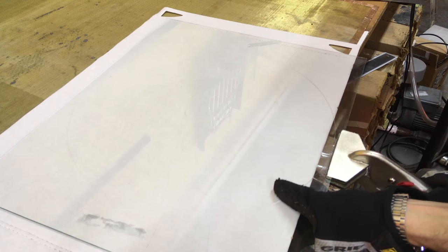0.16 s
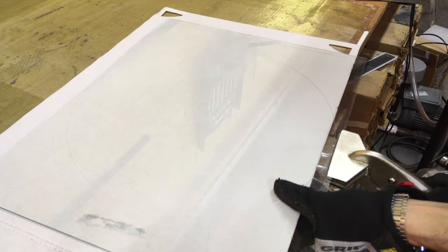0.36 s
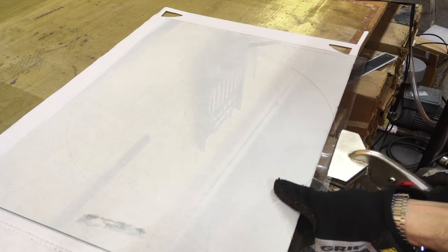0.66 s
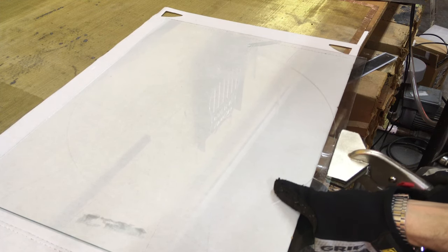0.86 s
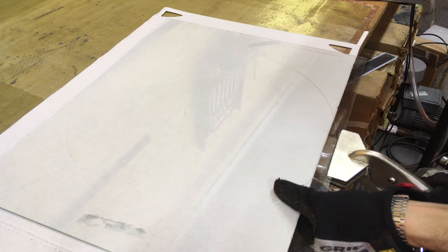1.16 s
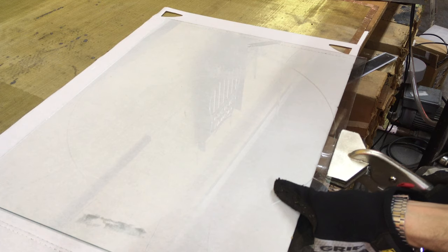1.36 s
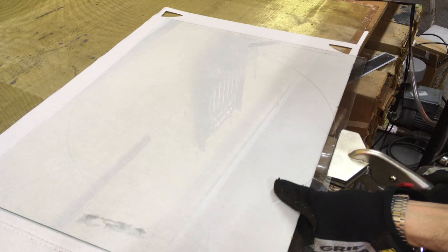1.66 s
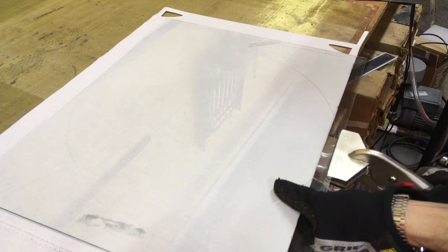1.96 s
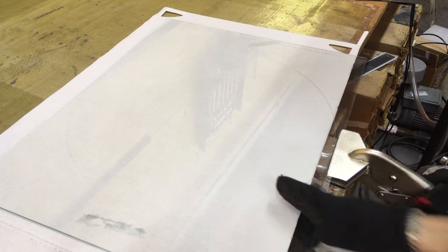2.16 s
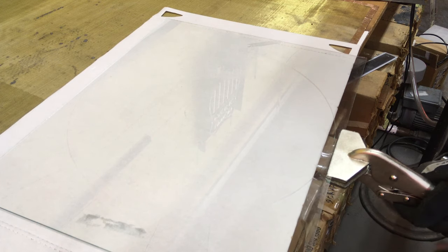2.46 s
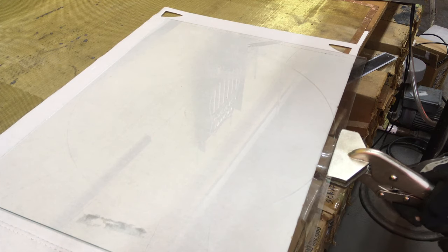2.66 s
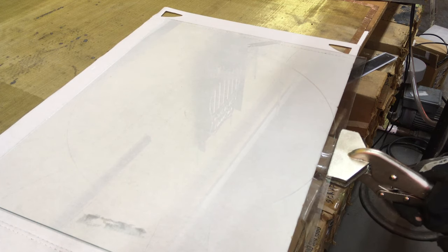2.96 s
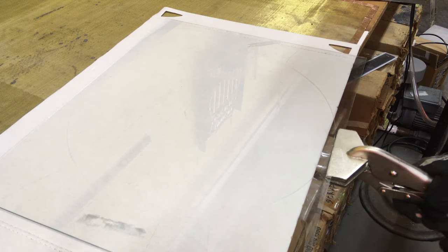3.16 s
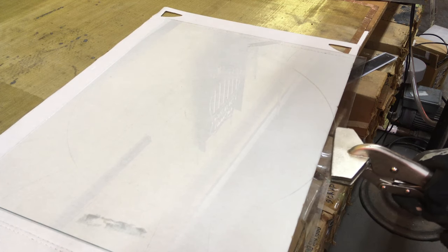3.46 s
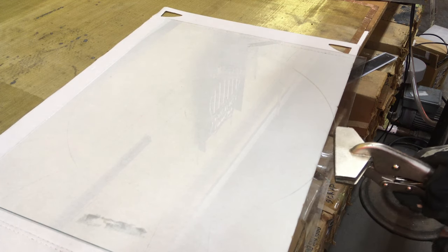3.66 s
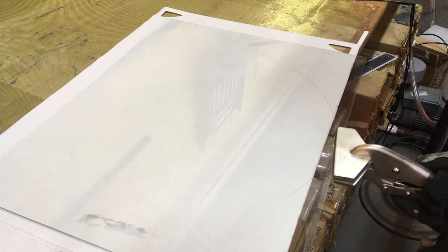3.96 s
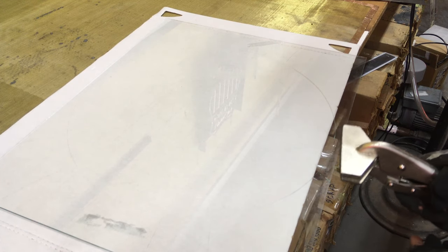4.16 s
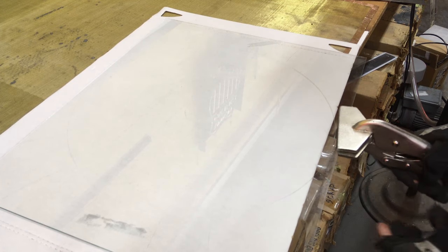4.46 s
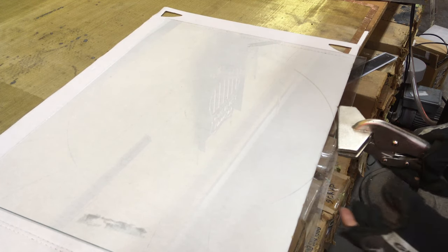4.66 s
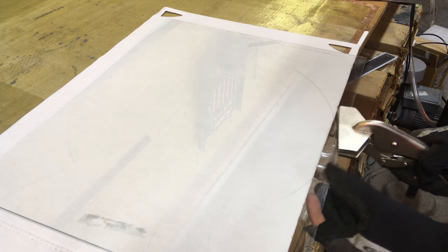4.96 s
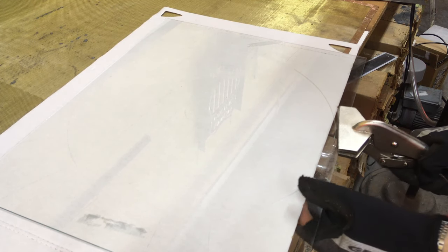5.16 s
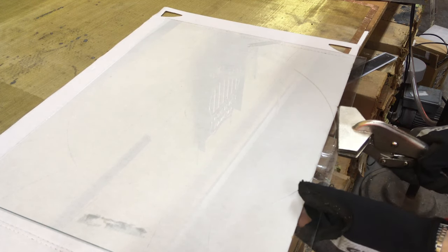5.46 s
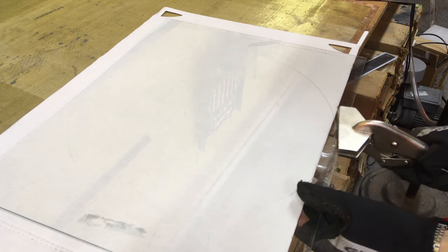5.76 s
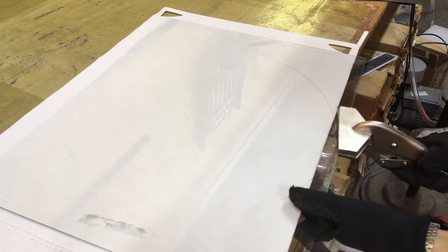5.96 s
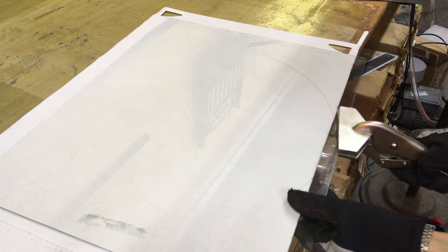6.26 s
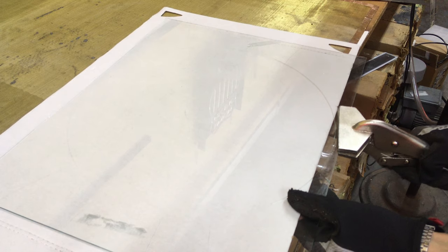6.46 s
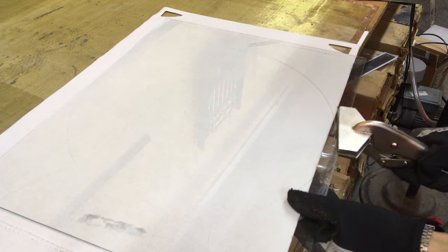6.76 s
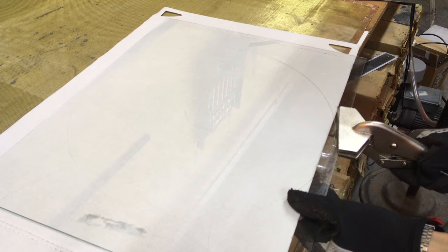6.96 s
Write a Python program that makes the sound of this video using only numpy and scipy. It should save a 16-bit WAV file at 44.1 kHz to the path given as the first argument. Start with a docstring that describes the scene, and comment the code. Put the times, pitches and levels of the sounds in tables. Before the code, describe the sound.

Crisp ticks, crackles and clinks of a glass sheet breaking bit by bit, with machines humming low in a workshop.

```python
"""A sheet of glass is broken out along its score in a workshop. From the start, far machines hum, a low
rumble wavers and ventilation hisses. Close by, the fracture advances in jerks: each crack is a gritty burst
with a bright hall tail; crumbs patter, the glass pings and the padded bench thuds now and then. At 3.1 s a
strip breaks free and rings; from 4.5 s an offcut is tapped, a shard clinks and a sliver rattles. At 5.6 s a
loud crack comes with a blow that rings the steel jaws; another crack follows at 6.5 s, then smaller ticks."""
import sys
import numpy as np
from scipy import signal
from scipy.fft import rfft, irfft
from scipy.io import wavfile
from scipy.ndimage import uniform_filter1d

SR = 44100
rng = np.random.default_rng(int(sys.argv[2]) if len(sys.argv) > 2 else 0)


def generate_wav(signal):
    """Clip the signal to [-1, 1] and save it as 16-bit WAV at the path in sys.argv[1]."""
    frames = np.transpose(np.atleast_2d(signal))
    scaled = np.clip(frames, -1, 1) * 32767
    pcm = np.round(scaled).astype(np.int16)
    wavfile.write(sys.argv[1], SR, pcm)


N = 312889

# Steady motor tones: pitch_hz, rms_db
MOTOR_TONES = [(60.1, -54), (70.05, -46.5), (73.5, -53.5), (78.2, -64), (163.5, -57.5), (1233, -70),
               (1416, -73.5)]
# Wavering machine drones: centre_hz, width_hz, rms_db
DRONE_BANDS = [(5.98, 1.67, -38), (26.5, 7.8, -48), (41.1, 1.2, -51), (55.8, 1.9, -62.5),
               (66.98, 0.82, -48.5), (110, 11, -55.5), (135, 3.6, -55), (233.7, 5.5, -66.5),
               (295, 7.3, -64.5)]
# Level of a low rumble near 19 and 36 Hz, wavering irregularly: time_s, lower_db, upper_db
RUMBLE_LEVELS = [(0.0, -37, -45), (1.32, -33, -36.5), (1.93, -35, -38), (3.28, -33.5, -38.5),
                 (3.34, -30, -46), (3.55, -35.5, -41), (3.73, -31, -51), (4.09, -36.5, -33),
                 (4.25, -32, -61), (4.4, -32, -40), (5.13, -35.5, -41.5), (5.17, -30.5, -46),
                 (5.33, -37, -33), (5.65, -34, -43), (5.83, -23.5, -35), (5.98, -35, -37.5),
                 (6.95, -32.5, -46.5), (7.09, -41, -32)]
# Spectral shape of the ventilation: frequency_hz, relative_density_db
AIR_SPECTRUM = [(26, -50), (45, -2), (83, -5.5), (115, -25), (159, -14.5), (208, -19), (302, -17),
                (459, -22.5), (633, -19), (790, -22.5), (1230, -26.5), (2000, -36.5), (3310, -67),
                (4800, -103), (14900, -94), (16500, -71)]
# Cracks and ticks: start_s, level_db, relative_body_db, relative_splinter_db, chip_hz, t60_s
CRACK_EVENTS = [(.0184,-49.5,-14,0,4550,0.06),(0.0784,-39.5,-5.5,-16,5900,0.083),(.118,-49,-1,-14,4600,0.021),(.155,-42.5,0,-21,4470,0.012),
                (.2056,-41.5,-18,-4,4860,0.12),(0.262,-44,-8,-2,4640,.046),(.298,-50,-5,4,5100,0.024),(.3646,-50,-11,10,4800,0.028),
                (.41,-55.5,-7,-18,5300,0.034),(.6594,-47,-1,-19,4540,.026),(.821,-50,1,-39,4000,0.023),(.896,-59,-11,-3,4600,0.046),(1.1767,-56.5,-13,-17,4600,0.035),(1.2306,-53,-10,-8,4600,0.044),(1.271,-56,-14,1,7500,.03),(1.4476,-56,-17,-6,5300,.03),(1.4772,-51,-4,-8,4600,0.045),
                (1.501,-50,-18,0,5800,.03),(1.5127,-54,-10,8,4400,0.04),(1.5343,-47.5,-18,-1,6600,0.047),(1.5903,-55.5,-4,11,5100,0.063),(1.6742,-39,-7,-27,5000,0.021),
                (1.726,-55,-8,-13,5000,0.04),(1.7505,-51,-1,-15,4700,0.036),(1.77,-57,-8,0,5400,.033),(1.8977,-58,-10,-26,2600,.033),(2.034,-53,-16,-3,2800,0.025),(2.0438,-44.5,-4,-8,2690,0.028),(2.0688,-54,-14,3,6200,0.031),(2.099,-41,-6,-12,5470,0.024),
                (2.135,-55,-12,8,4700,0.032),(2.1782,-53.5,-17,10.5,6500,0.044),(2.2902,-59,-8,10,7500,0.044),(2.331,-62,-10,2,2700,.03),(2.437,-53.5,0,11,3300,0.049),(2.5503,-56,-16,1,5000,0.029),
                (2.5607,-56,-20,1,4300,0.04),(2.676,-62,-4,-15,3300,.033),(2.723,-55,-21,9,3120,0.047),(2.7854,-52.5,-14,9,7460,0.06),(2.836,-54.5,-2,12.5,5900,0.064),(2.953,-49.5,-2,-27,3480,0.025),
                (3.0667,-26,-6.5,10,6600,0.072),(3.082,-34,8.5,11,6200,0.018),(3.094,-39,-27,-4,3380,.051),(3.2147,-54.5,2,-9,2630,0.042),(3.2431,-54,0,-10,5730,0.04),
                (3.274,-44.5,-14,-7,3000,0.029),(3.285,-41.5,-6.5,-5,6740,0.033),(3.31,-51,-16,-6,7100,0.042),(3.3287,-54,-10,-8,5600,0.041),(3.359,-51,-5,3,2760,0.036),
                (3.465,-49.5,-12,-15,5170,0.056),(3.5217,-34,-9,10,5650,0.07),(3.533,-34,3,-14,5400,0.0082),(3.557,-42,-11,-10,7500,0.062),
                (3.676,-53,-10,-9,2900,0.034),(3.707,-39,-5.5,4,2620,.036),(3.7538,-38.5,-4,3,5860,0.041),(3.8635,-50.5,-4,2,4900,0.047),(3.8932,-46,-6,3,5550,0.039),
                (3.9516,-50,-15,-6,6000,0.041),(4.0911,-46,6,-25,2750,.019),(4.1392,-53.5,3,-15,4000,0.048),(4.158,-49.5,3,-15,3080,0.037),(4.169,-52,-12,-12,3100,.03),(4.228,-46,-6,-7,5640,0.04),
                (4.2693,-54.5,-18,-1,5300,.03),(4.3246,-48.5,-5,-4,3120,0.043),(4.3578,-55,-15,-11,2860,0.027),(4.416,-39,-10,-17,4040,0.023),(4.458,-70,11,-18,2700,.049),
                (4.4737,-53,-18,-9,4700,.03),(4.4985,-37,-5,2,7300,0.1),(4.524,-42,-11,-2,5000,.03),(4.564,-41,-15,13,6760,0.082),
                (4.592,-44,-10,3,5100,0.032),(4.603,-49,-14,13,5200,.03),(4.6713,-50,-13,-22,3400,0.029),(4.687,-48.5,5,15,3000,0.015),(4.716,-38,-14,-9,4000,0.044),
                (4.734,-39,0.5,-16,4260,.061),(4.779,-55.5,8,13,5000,.026),(4.916,-57.5,6,16,3800,.028),(4.9472,-39,-7,-2,4200,0.034),(5.016,-53,-27,6,4700,0.04),
                (5.0544,-59,-9,-9,4500,.03),(5.0724,-59.5,0,-3,6100,.03),(5.096,-54,-2,-3,4500,.03),(5.1143,-53,-5.5,2,4500,0.042),(5.1357,-54,-4,-4,4600,.03),(5.146,-49,-19,5,4400,.04),(5.158,-43.5,-23,-2,4700,0.029),
                (5.173,-49,-11,2,6800,.03),(5.2037,-40.5,-11,8,5500,0.045),(5.2164,-53,2,-13,5200,.03),(5.234,-57,1,-1,4400,0.032),(5.259,-52,-7,-12,6500,0.034),
                (5.4146,-55.5,-3,-2,5600,0.036),(5.518,-57,-4.5,-5,5600,.026),(5.561,-59,-14,5,2600,.03),(5.577,-57,-8,-4,4400,.03),(5.5826,-60,-8,16,4600,0.038),(5.5995,-15.5,-7.5,-3,3260,0.034),(5.8132,-58,-8,-5,3500,.03),(5.839,-64.5,17.5,-18,2600,0.046),(5.864,-51.5,-12,14,2880,0.024),(5.8818,-23,-8,-22,5300,0.03),
                (5.895,-38,-1,-14,5550,.041),(5.91,-43,-4,6,5600,.03),(5.923,-41,-1.5,-20,4400,0.03),(5.941,-54,-16,-11,5800,.027),(5.9698,-48.5,-10,-8,5400,.03),(6.167,-62,12,-17,3100,0.036),(6.2015,-60,-6,-5,4800,.035),(6.2137,-33.5,-6,-18,5200,0.035),
                (6.2394,-35,-11,3,5200,0.034),(6.341,-48,2,-7,4600,0.037),(6.353,-41,-13,-11.5,4700,0.029),(6.373,-40,-23,4,2730,.03),
                (6.3908,-45,-12,0,5900,.03),(6.4066,-40,-7,-1,5200,0.04),(6.472,-32.5,-28,4,5900,.037),(6.482,-14,-53,5.5,5740,0.028),
                (6.507,-33,-31,6,5300,.037),(6.6646,-57,-14,-21,5000,.03),(6.689,-48,-16,-1,5900,0.029),(6.6984,-44.5,-9,6,5230,0.04),(6.72,-45,-8,3,5300,.03),
                (6.749,-39,-12,-1,5900,0.038),(6.813,-42.5,-8,-4,5730,0.034),(6.8365,-37,7.5,-33,3300,0.03),(6.9007,-55,-15.5,-10,3140,.03),(7.0143,-58.5,-11,9.5,5000,0.075)]
# Reverberation of the hall: band_hz, relative_db, t60_s
HALL_BANDS = [(1330, -10, 0.95), (2060, -7, 0.93), (3300, -4.5, 0.79), (5000, 0.3, 0.73),
              (7000, -2.5, 0.42), (10300, -20, 0.51), (14000, -13, 0.22)]
# Showers of fine crumbs: start_s, length_s, level_db, low_hz, high_hz
CRUMB_SHOWERS = [(0.07, 0.036, -48, 3200, 7400), (0.102, 0.39, -54, 2500, 7000),
                 (0.194, .05, -45, 3000, 7500), (0.258, 0.045, -46, 3500, 7440),
                 (0.647, .026, -50, 3500, 7000), (2.053, 0.27, -58.5, 2500, 7000),
                 (3.07, 0.31, -58, 6000, 15000), (3.512, 0.14, -47.5, 5000, 15400),
                 (4.51, 0.16, -49, 5000, 15000), (4.682, .05, -54.5, 6000, 15000),
                 (4.75, 0.32, -65, 7000, 15000), (5.04, 0.3, -63, 3800, 12500),
                 (6.335, 0.042, -51, 3000, 9000)]
# Short single-pitch glass pings, mostly sounding with a crack: start_s, level_db, pitch_hz, t60_s
CRACK_PINGS = [(0.205, -43, 2600, 0.044), (2.2124, -45.5, 4780, 0.019), (2.4375, -42, 3200, 0.015),
               (2.7224, -50, 3200, 0.02), (3.077, -25.5, 2430, 0.022), (3.5217, -39, 2600, 0.023),
               (3.5227, -27, 9050, 0.013), (3.531, -25.5, 7600, 0.017), (3.557, -36, 7450, 0.04),
               (3.7094, -48, 2540, 0.045), (4.417, -38, 3430, 0.027), (4.688, -45, 2020, 0.06),
               (6.839, -28, 3100, 0.012)]
# Knocks on the bench: start_s, level_db, upper_edge_hz, t60_s
BENCH_KNOCKS = [(1.675, -41, 605, 0.071), (3.068, -45, 550, .04), (3.53, -35, 810, 0.013),
                (4.358, -36.5, 436, 0.068), (4.42, -39.5, 327, 0.042), (4.459, -40.5, 1200, 0.049),
                (5.6, -37.5, 1190, 0.11)]

# Impacts on each ringing body: start_s, level_db
STRIP_SNAPS = [(3.069, -29.5)]
OFFCUT_TAPS = [(4.5002, -34), (4.507, -34.5), (4.564, -38)]
SHARD_CLINKS = [(4.7172, -34), (4.736, -40.5)]
SLIVER_RATTLE = [(5.0544, -49), (5.0724, -56), (5.0943, -49), (5.1147, -63), (5.1357, -57), (5.1466, -54),
                 (5.1582, -44), (5.174, -57), (5.2036, -58), (5.2345, -53)]
JAW_BLOWS = [(5.5992, -40)]
# Normal modes of the same bodies: pitch_hz, relative_db, t60_s
STRIP_MODES = [(1448, -6, 0.056), (3100, -10, 0.16), (3320, -22, .2), (4180, 7, .02), (6450, 12, 0.0094),
               (7500, -18, .2), (9500, -21, .15), (9600, 5, .015), (11200, 2, 0.016), (14300, -1, .012)]
OFFCUT_MODES = [(3584, -3.5, 0.061), (4900, 1, 0.033), (5230, -3, 0.045), (6100, -11, 0.032),
                (6600, 2, 0.024), (7550, 3, 0.022), (9430, -6, 0.023), (11200, -3, 0.027),
                (15400, -20, .025)]
SHARD_MODES = [(3750, 1, 0.07), (4900, -7, 0.015), (5900, -0.5, 0.026), (7550, -2, 0.026),
               (10970, 4, 0.041), (14300, -27, .03)]
SLIVER_MODES = [(4300, -3, .03), (8450, -7, 0.018), (11600, -6.5, 0.018), (15400, -11, .018)]
JAW_MODES = [(2033, 3.5, 0.25), (2751, -1.5, 0.45), (2800, 5, 0.035), (3200, 22, 0.018), (3200, -8, 0.45),
             (3320, -4, 0.47), (4000, -7, .4), (4000, 23.5, 0.035), (4340, -20, .3), (4600, -8, 0.45),
             (5560, -18, 0.35), (5000, 16, 0.031), (6260, -17, .3), (7450, 24.5, 0.023), (7750, -15, .25),
             (8200, -11, 0.34), (9300, -16, 0.29), (10900, 19.5, 0.017)]


def undb(db):
    """Amplitude ratio of a level in decibels."""
    return 10 ** (np.asarray(db) / 20)


def unit(x):
    """Normalisation to an rms of 1."""
    return x / np.sqrt(np.mean(x ** 2))


def band(x, low_hz, high_hz, order=2):
    """Butterworth band-pass filtering."""
    sections = signal.butter(order, [low_hz, min(high_hz, SR / 2.1)], "band", fs=SR, output="sos")
    return signal.sosfilt(sections, x)


def decay(t, t60_s):
    """Exponential damping, 60 dB down after t60_s."""
    return np.exp(-np.log(1000) * t / max(t60_s, .003))


def add(track, start_s, x):
    """Superposition of x on the track from start_s."""
    i = min(int(start_s * SR), N)
    track[i:i + len(x)] += x[:N - i]


def wander(rate_hz):
    """Slow random modulation: held values, smoothed twice, with a spread near 1."""
    hold = int(SR / rate_hz)
    steps = np.repeat(rng.standard_normal(N // hold + 1), hold)
    return 1.33 * uniform_filter1d(uniform_filter1d(steps, hold), hold)[:N]


def machines(in_phase_s=2.09):
    """Beating: motor tones close in pitch interfere, and narrow noise bands waver as drones."""
    t = np.arange(N) / SR
    out = sum(undb(db) * np.sqrt(2) * np.cos(2 * np.pi * hz * (t - in_phase_s)) for hz, db in MOTOR_TONES)
    for hz, width_hz, db in DRONE_BANDS:
        drone = band(rng.standard_normal(N), hz - width_hz / 2, hz + width_hz / 2, order=1)
        out += undb(db) * unit(drone)
    return out


def rumble(centres_hz=(19, 35.5), drift=0.0298, flicker_db=2.5):
    """Amplitude and frequency modulation: two very low tones waver irregularly, heard as a rumble."""
    out, t = np.zeros(N), np.arange(N) / SR
    times_s, *contours_db = np.transpose(RUMBLE_LEVELS)
    for hz, contour_db in zip(centres_hz, contours_db):
        pitch_hz = hz * (1 + drift * wander(2.5))
        phase = 2 * np.pi * (rng.random() + np.cumsum(pitch_hz) / SR)
        level_db = np.interp(t, times_s, contour_db) + flicker_db * wander(7.6)
        out += undb(level_db) * np.sqrt(2) * np.sin(phase)
    return out


def ventilation(rms_db=-48.5, wander_db=.4):
    """Broadband flow noise, strongest at low frequencies, whose level wanders a little."""
    hz, db = np.transpose(AIR_SPECTRUM)
    bins_hz = np.arange(N // 2 + 1) * SR / N + 1
    shape = undb(np.interp(np.log(bins_hz), np.log(hz), db))
    noise = irfft(rfft(rng.standard_normal(N)) * shape, N)
    return undb(rms_db + wander_db * wander(2.5)) * unit(noise)


def cracks(attack_s=0.00081, grain_samples=25, grain_spread_db=1.65):
    """Brittle fracture runs in jerks, radiating gritty bursts; returns direct sound and two echo feeds."""
    direct, to_bench, to_hall = np.zeros((3, N))
    t = np.arange(5000) / SR
    click = signal.unit_impulse(400)
    for start_s, level_db, body_db, splinter_db, chip_hz, t60_s in CRACK_EVENTS:
        dust_db = -10.5 + 0.36 * splinter_db
        # low_hz, high_hz, relative_db, t60_s
        layers = [(2500, 8000, -2, t60_s),  # broad snap
                  (chip_hz * 0.9, chip_hz * 1.286, -6, t60_s),  # ringing chip
                  (1100, 2500, body_db, 0.86 * t60_s),
                  (8000, 12000, splinter_db, 0.17 * t60_s),
                  (12000, 17000, dust_db, 0.31 * t60_s)]
        noises = rng.standard_normal((len(layers), len(t)))
        grains_db = grain_spread_db * rng.standard_normal(len(t) // grain_samples)
        grit = noises * undb(np.repeat(grains_db, grain_samples))
        burst = sum(undb(db) * unit(band(noise, low, high)) * decay(t, layer_t60_s)
                    for noise, (low, high, db, layer_t60_s) in zip(grit, layers))
        add(direct, start_s, undb(level_db + 1.5) * burst * (1 - np.exp(-t / attack_s)))
        # Bench and walls gather the crack from all sides, so they get its smooth colour as one click.
        colour = sum(undb(db) * unit(band(click, low, high, order=1)) for low, high, db, _ in layers)
        send_db = -22 - 0.11 * (level_db + 52.5)  # loud cracks are nearer and drier
        add(to_bench, start_s, undb(level_db) * colour)
        add(to_hall, start_s, undb(level_db + send_db) * colour)
    return direct, to_bench, to_hall


def bench_echoes(x, delay_s=.0015, hold_s=.012, release_s=0.0036):
    """Early reflections off bench and sheet prolong each crack by some milliseconds."""
    t = np.arange(1500) / SR
    echoes = unit(band(rng.standard_normal(len(t)), 4150, 5960))
    envelope = (t > delay_s) / (1 + np.exp((t - hold_s) / release_s))
    return signal.fftconvolve(x, undb(-44) * echoes * envelope)[:N]


def hall(x, build_s=0.0024):
    """Diffuse reverberation: dense echoes build up, then each band dies at its own rate."""
    t = np.arange(SR) / SR
    tail = sum(undb(db) * unit(band(rng.standard_normal(SR), hz / 1.36, hz * 1.17)) * decay(t, t60_s)
               for hz, db, t60_s in HALL_BANDS)
    onset = 1 - np.exp(-(t / build_s) ** 2)
    return signal.fftconvolve(x, undb(-33.5) * tail * onset)[:N]


def crumbs(ticks_per_s=1350, tick_t60_s=0.0038, attack_s=0.0032):
    """Shot noise: tiny random impacts of uneven size merge into showers that fade linearly."""
    out = np.zeros(N)
    ticks = (rng.random(N) < ticks_per_s / SR) * undb(0.57 * rng.exponential(size=N))
    tick_envelope = decay(np.arange(500) / SR, tick_t60_s)
    patter = signal.fftconvolve(ticks, tick_envelope)[:N] * rng.standard_normal(N)
    for start_s, length_s, db, low_hz, high_hz in CRUMB_SHOWERS:
        t = np.arange(int(length_s * SR)) / SR
        envelope = (1 - t / length_s) * np.minimum(t / attack_s, 1)
        shower = patter[int(start_s * SR):][:len(t)] * envelope
        add(out, start_s, undb(db) * band(shower, low_hz, high_hz))
    return out


def ring(modes, beat_depth=0.51, beat_ratio=0.0079):
    """Free vibration: damped modes beat like close pairs; each blow shares its strength out anew."""
    out, t = np.zeros(SR // 2), np.arange(SR // 2) / SR
    scatter = rng.standard_normal((len(modes), 3)) * [0.94, .002, 3]
    for (hz, db, t60_s), (offset_db, detune, beat_phase) in zip(modes, scatter):
        tone = np.sin(2 * np.pi * hz * (1 + detune) * t)
        beat = 1 + beat_depth * np.sin(2 * np.pi * hz * beat_ratio * t + beat_phase)
        out += undb(db + offset_db) * decay(t, t60_s) * tone * beat
    return out


def crack_pings():
    """Damped oscillation: the glass rings briefly at a single pitch, mostly together with a crack."""
    out = np.zeros(N)
    for start_s, db, hz, t60_s in CRACK_PINGS:
        add(out, start_s, undb(db) * ring([(hz, 0, t60_s)]))
    return out


def bench_thuds(attack_s=0.00033):
    """Heavy damping: the padded bench answers with a dull octave of noise instead of a pitch."""
    out, t = np.zeros(N), np.arange(4000) / SR
    for start_s, db, upper_hz, t60_s in BENCH_KNOCKS:
        noise = unit(band(rng.standard_normal(len(t)), upper_hz / 2, upper_hz, order=1))
        envelope = decay(t, t60_s) * (1 - np.exp(-t / attack_s))
        add(out, start_s, undb(db) * noise * envelope)
    return out


def glass_and_jaws():
    """Modal resonance: the glass pieces and the steel jaws ring at their own natural frequencies."""
    out = np.zeros(N)
    bodies = [(STRIP_SNAPS, STRIP_MODES), (OFFCUT_TAPS, OFFCUT_MODES), (SHARD_CLINKS, SHARD_MODES),
              (SLIVER_RATTLE, SLIVER_MODES), (JAW_BLOWS, JAW_MODES)]
    for impacts, modes in bodies:
        for start_s, db in impacts:
            add(out, start_s, undb(db) * ring(modes))
    return out


def scene():
    """Superposition at one point of background, direct sound and reflections."""
    background = machines() + rumble() + ventilation()
    direct, to_bench, to_hall = cracks()
    struck = crumbs() + crack_pings() + glass_and_jaws()
    reflections = bench_echoes(to_bench) + hall(to_hall + undb(-24.5) * struck)
    return (background + direct + struck + bench_thuds() + reflections)[None]


def record(dry, cutoff_hz=16300):
    """Band limiting: a steep elliptic low-pass removes the highest treble."""
    return signal.sosfilt(signal.ellip(8, .2, 70, cutoff_hz, fs=SR, output="sos"), dry)


dry = scene()
out = record(dry)
generate_wav(out)
```